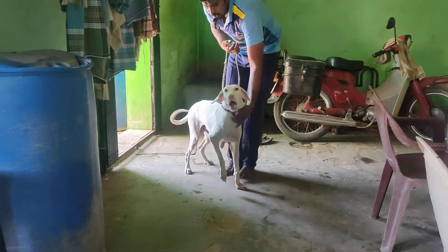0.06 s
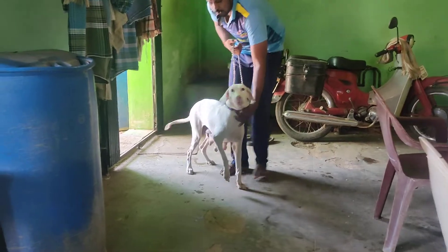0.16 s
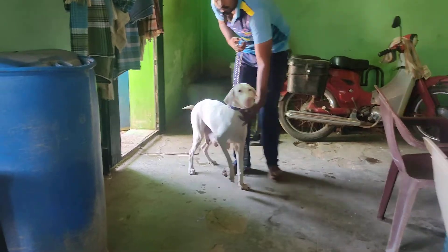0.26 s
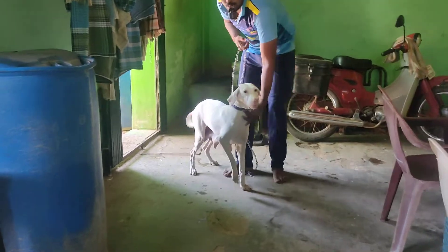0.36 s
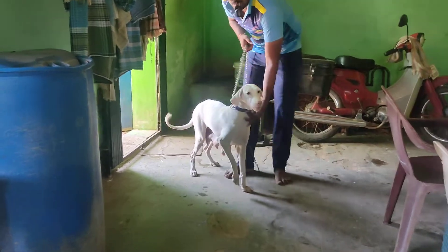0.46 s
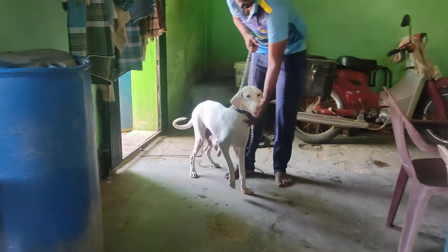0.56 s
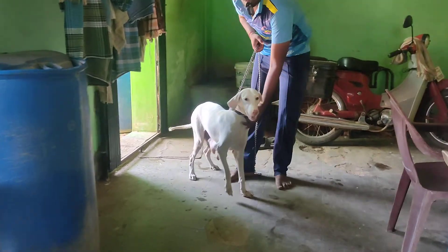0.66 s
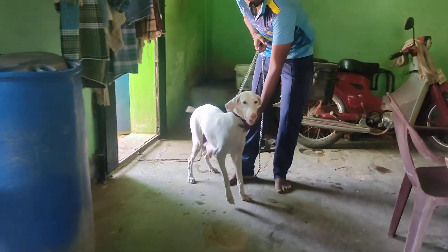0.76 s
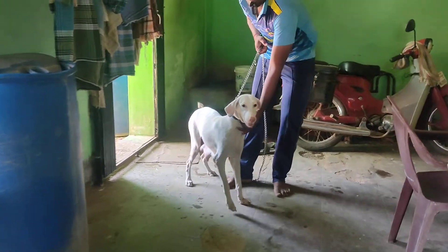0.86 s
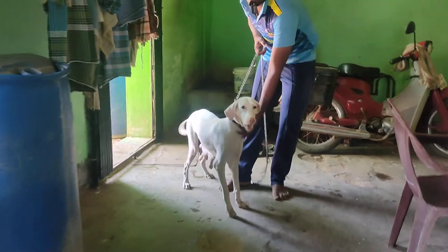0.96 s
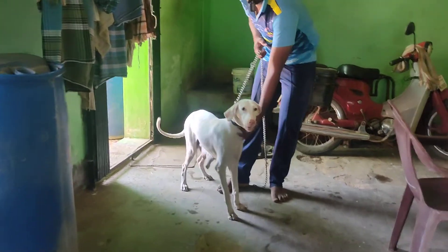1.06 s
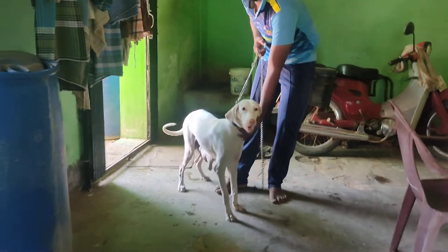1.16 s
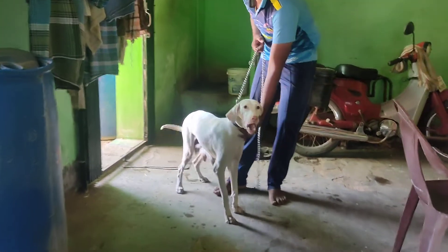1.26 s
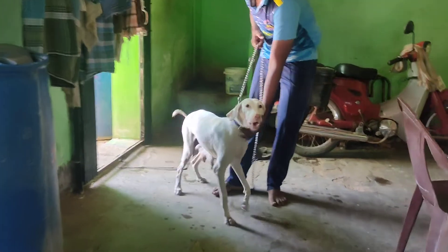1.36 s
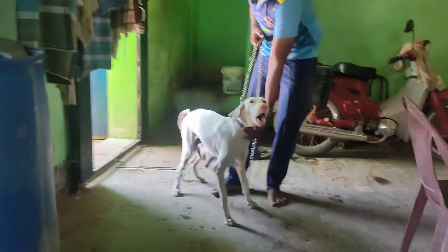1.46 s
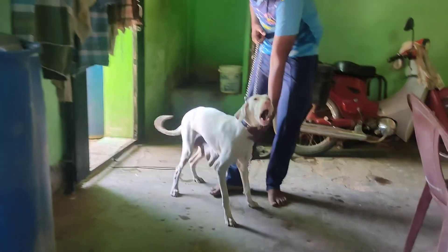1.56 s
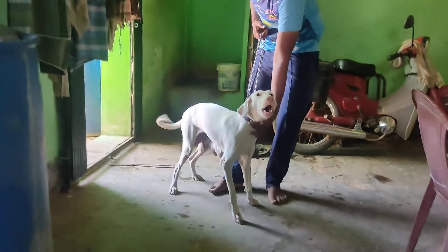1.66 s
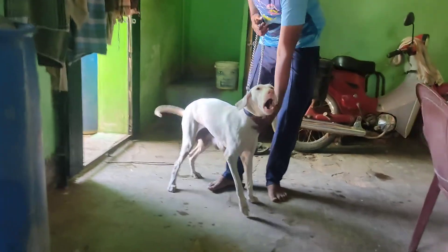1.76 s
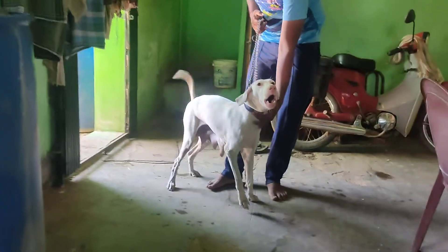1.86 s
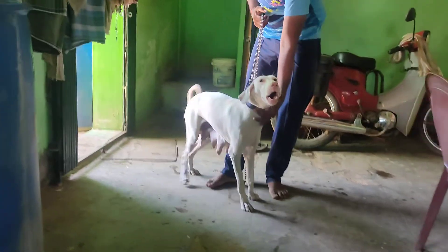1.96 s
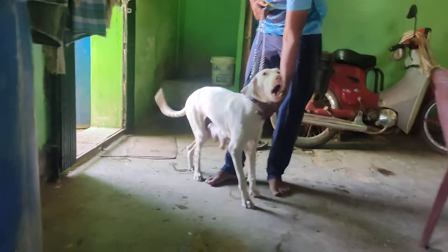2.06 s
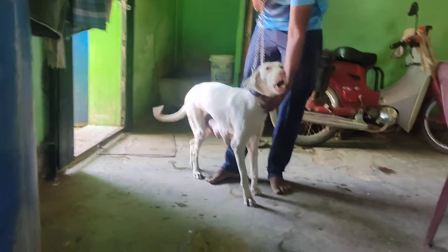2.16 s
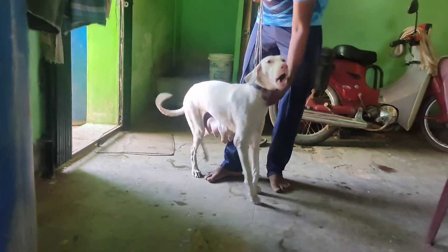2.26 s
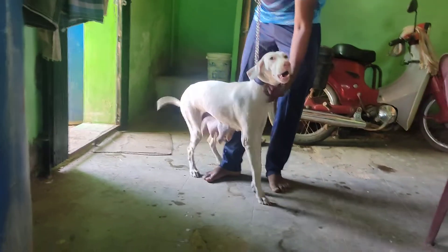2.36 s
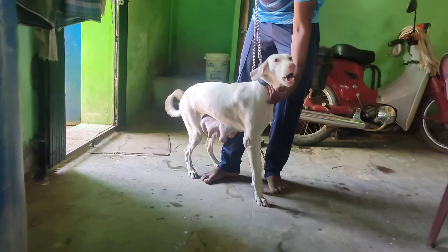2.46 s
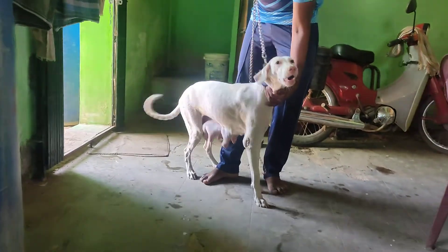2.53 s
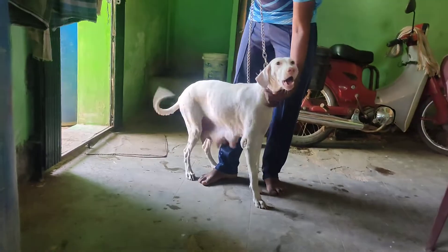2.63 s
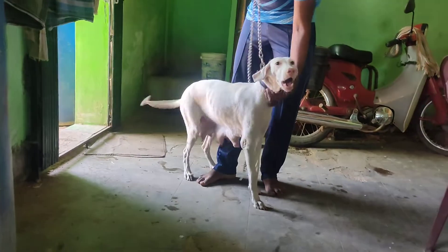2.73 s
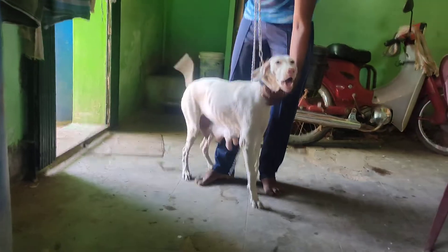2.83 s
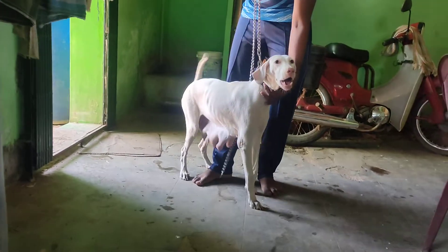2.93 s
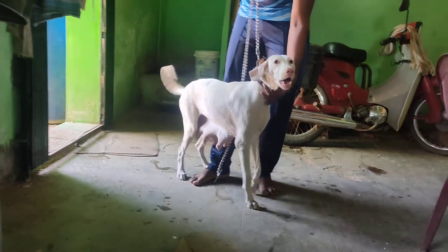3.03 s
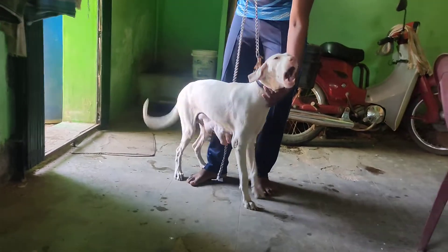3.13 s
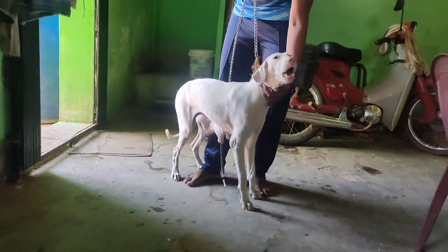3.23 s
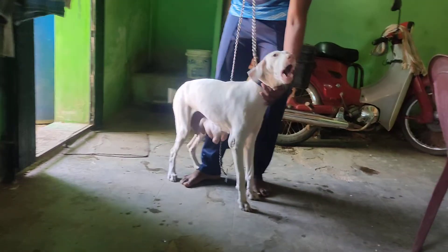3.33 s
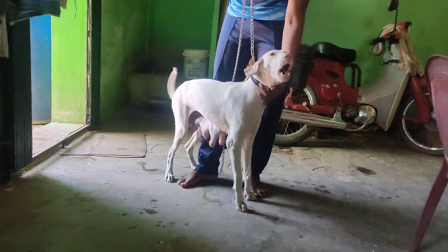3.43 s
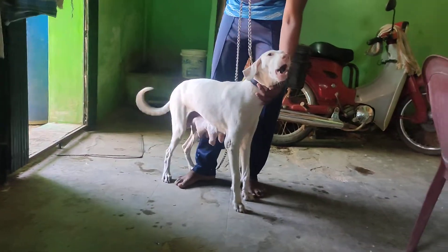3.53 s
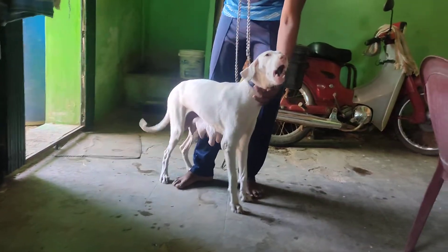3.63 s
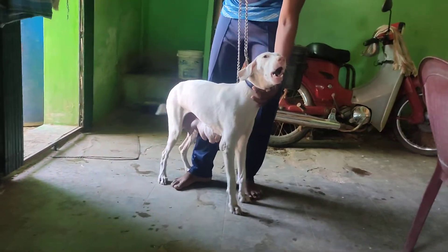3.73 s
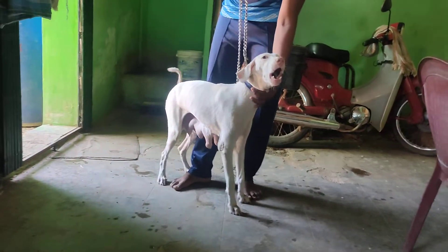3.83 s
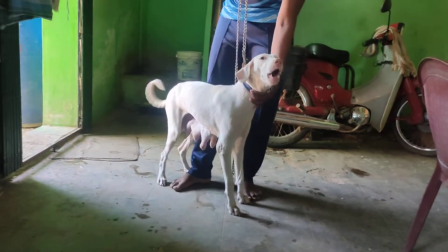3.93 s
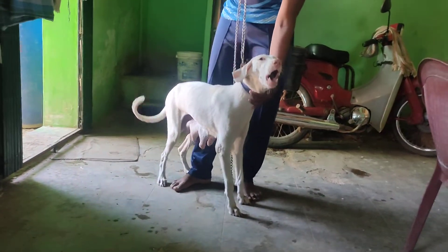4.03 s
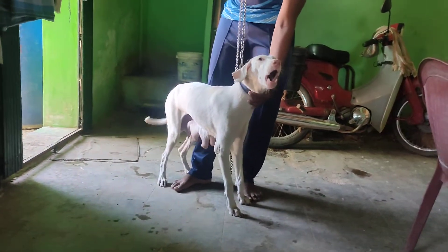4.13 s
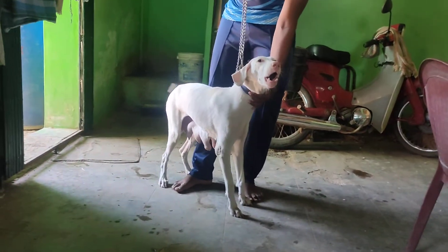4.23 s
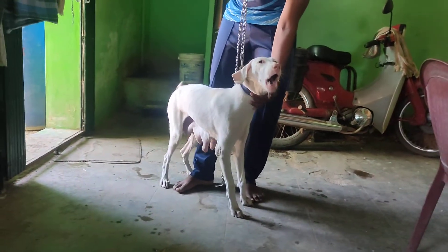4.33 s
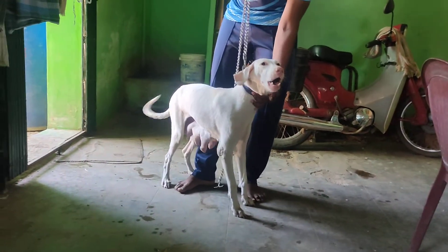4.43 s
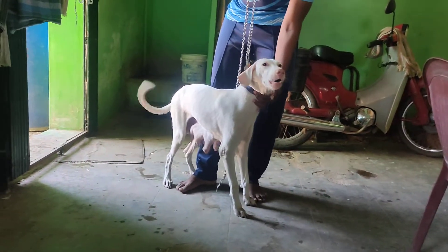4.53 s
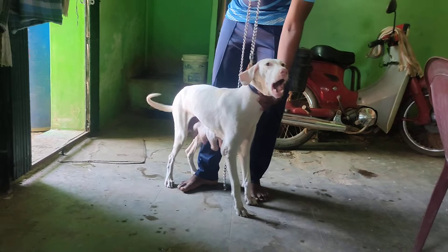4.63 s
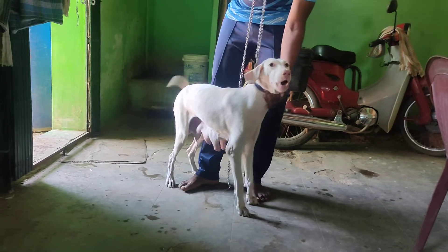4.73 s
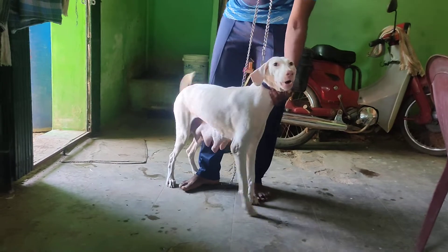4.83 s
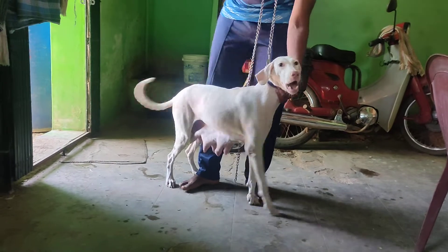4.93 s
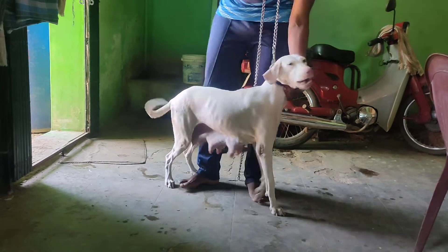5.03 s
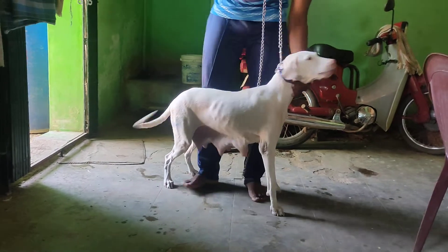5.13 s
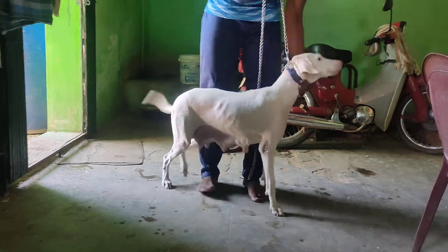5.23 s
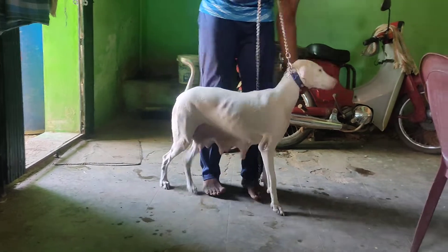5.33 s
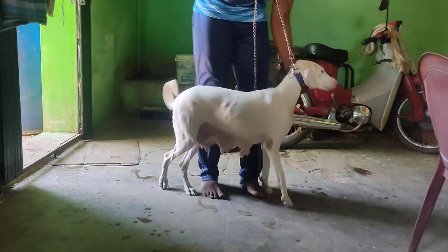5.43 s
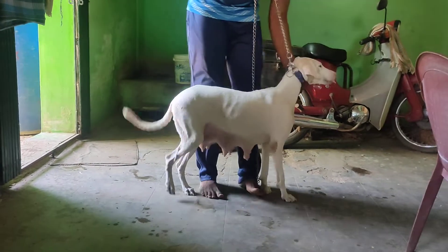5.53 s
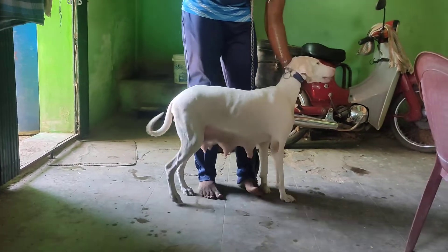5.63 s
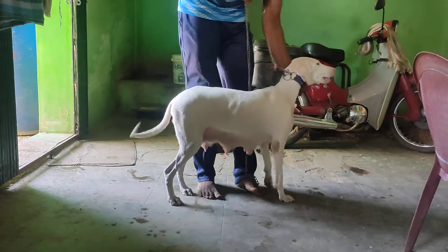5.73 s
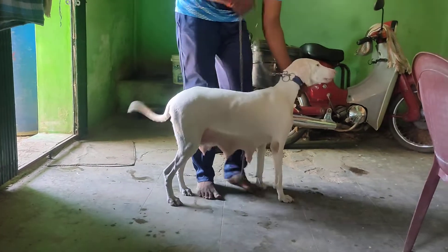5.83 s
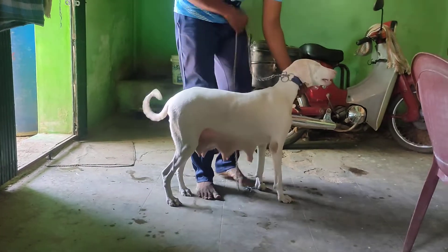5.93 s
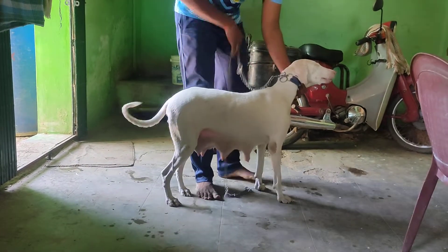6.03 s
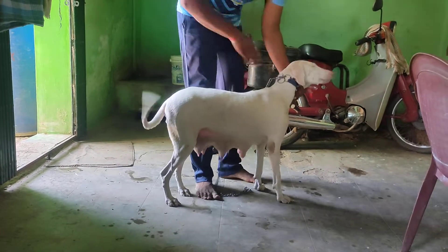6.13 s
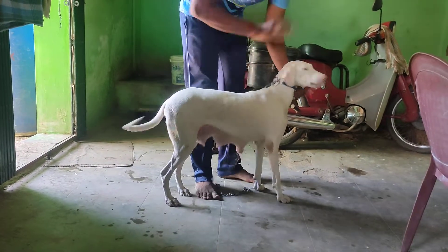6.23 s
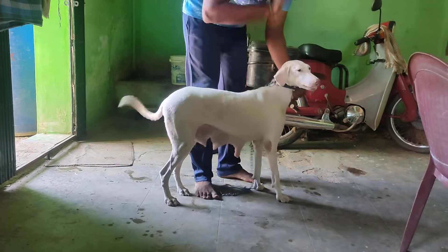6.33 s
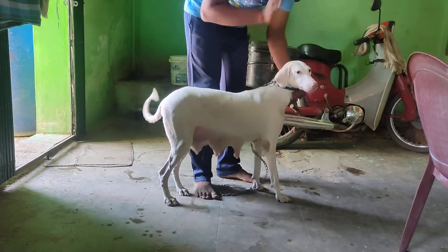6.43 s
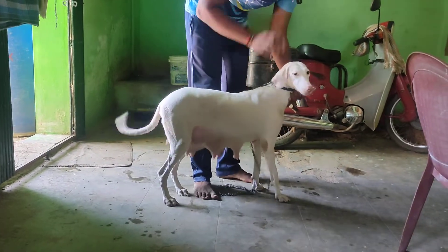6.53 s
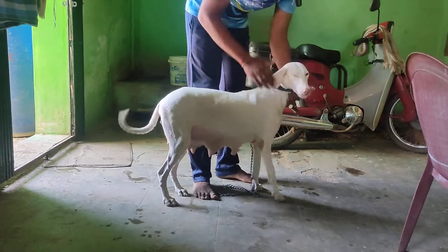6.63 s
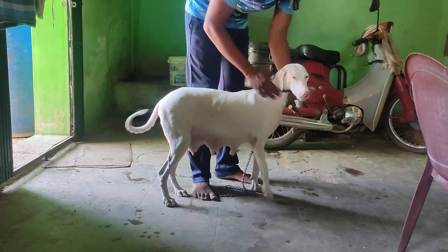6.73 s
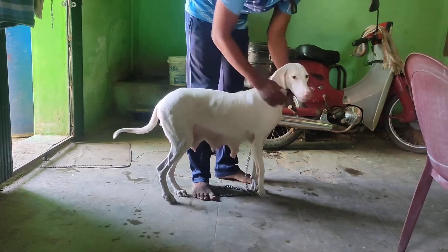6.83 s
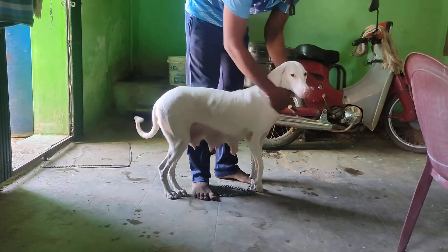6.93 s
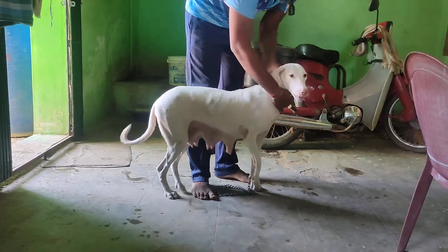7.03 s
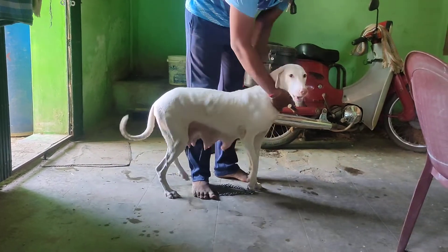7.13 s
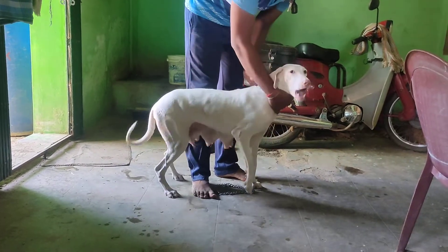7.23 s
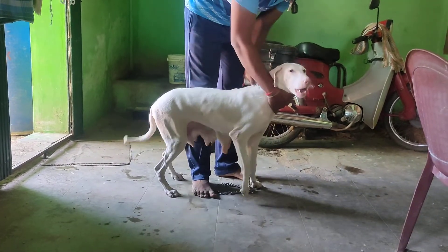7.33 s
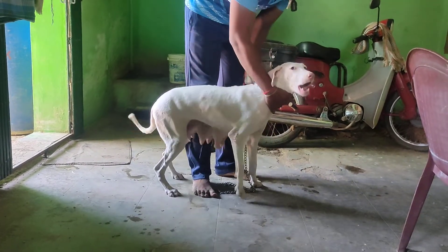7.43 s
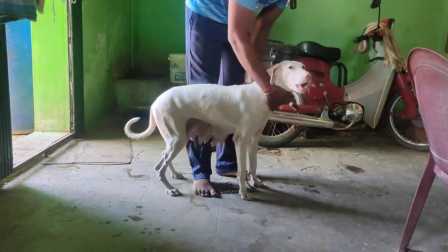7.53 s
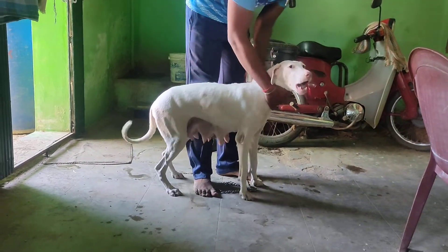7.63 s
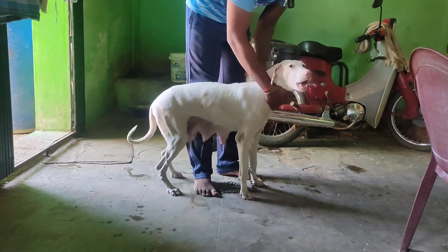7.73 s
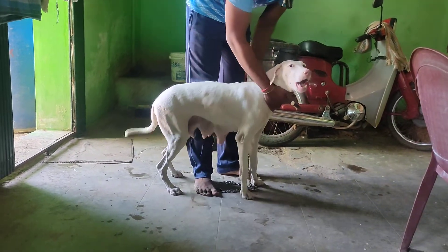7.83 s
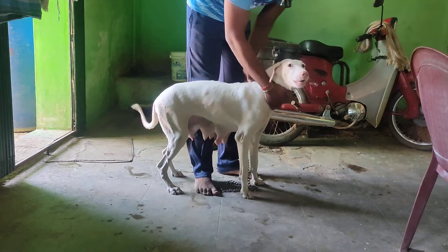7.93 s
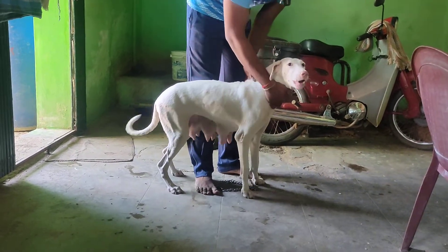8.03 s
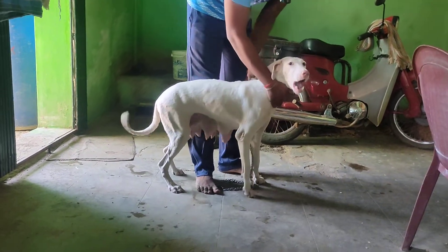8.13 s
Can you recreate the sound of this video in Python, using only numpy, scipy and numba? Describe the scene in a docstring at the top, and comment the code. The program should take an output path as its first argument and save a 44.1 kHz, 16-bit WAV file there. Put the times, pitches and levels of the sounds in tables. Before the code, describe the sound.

Hoarse, ringing dog barks fire quickly in a bare echoing room, broken by a rasping breath, a groan, a chain rattle and renewed barking.

```python
"""Chained dog barking in a bare concrete room

A dog barks in rapid runs, with rasping in-breaths, groans, growls, huffs and thin wheezes: uneven fold pulses
and air through resonances. A chain slides as noise grains and rings chime as struck decaying modes. Room noise,
a thin tone and a high whine lie behind; a far yap comes only as echo. All but these beds and the yap is heard
both directly and in a strong room echo (the chain only directly). A phone cuts bass, ducks gain and limits."""
import sys
import numpy as np
from scipy import signal
from scipy.fft import rfft, irfft
from scipy.io import wavfile
from scipy.ndimage import uniform_filter1d, minimum_filter1d
from numba import njit

SR = 44100
rng = np.random.default_rng(int(sys.argv[2]) if len(sys.argv) > 2 else 0)


def generate_wav(signal):
    """Clip the signal to [-1, 1] and save it as 16-bit WAV at the path in sys.argv[1]."""
    frames = np.transpose(np.atleast_2d(signal))
    scaled = np.clip(frames, -1, 1) * 32767
    pcm = np.round(scaled).astype(np.int16)
    wavfile.write(sys.argv[1], SR, pcm)


N = 360738

# throat resonances of all calls but the barks, for a 600 Hz mouth: hz, width_hz, level_db (relative)
RASP_RING = [(1321.8, 300, 4.5), (2080, 510, 3), (2800, 610, 2.5), (3528.5, 470, 1), (3820, 830, -9)]
# hiss resonances at the teeth in the same calls: hz, width_hz, level_db (relative)
RASP_HISS = [(5700, 910, -3.5), (7000, 1500, 8), (9500, 1400, 1.5), (14600, 1300, 0.5)]


def from_db(db):
    """Decibels to an amplitude factor."""
    return 10 ** (np.asarray(db) / 20)


def rms_one(x):
    """Scale to an rms of 1."""
    return x / np.sqrt(np.mean(x ** 2) + 1e-20)


def in_time(tables, fade=.014):
    """A gate that opens from each table's start and shuts fade s past its end, then the joined columns."""
    t, rows = np.arange(N) / SR, np.concatenate(tables)
    gate = sum(np.clip(np.minimum(t - a[0][0], a[-1][0] + fade - t) / fade, 0, 1) for a in tables)
    return [gate] + [np.interp(t, rows[:, 0], column) for column in rows[:, 1:].T]


def drift(rate_hz):
    """Random wander, noise through a two-pole low-pass at rate_hz; rms 1."""
    r = np.exp(-2 * np.pi * rate_hz / SR)
    return rms_one(signal.lfilter([1], [1, -2 * r, r * r], rng.standard_normal(N + SR))[SR:])


@njit
def moving_peak(x, hz, width_hz, sr):
    """A two-pole resonance whose centre follows hz."""
    out, r = np.zeros(len(x)), np.exp(-np.pi * width_hz / sr)
    for i in range(2, len(x)):
        feedback = 2 * r * np.cos(2 * np.pi * hz[i] / sr) * out[i - 1] - r * r * out[i - 2]
        out[i] = x[i] - x[i - 2] + feedback
    return out


def sharp_peak(x, hz, width_hz):
    """A resonance applied twice, for dark valleys on both sides; rms 1."""
    hz, width_hz = hz * np.ones(N), float(width_hz)
    once = moving_peak(x, hz, width_hz, SR)
    return rms_one(moving_peak(once, hz, width_hz, SR))


def peaks(x, modes, stretch=1):
    """Resonances side by side, all moved by stretch; rms 1."""
    return rms_one(sum(from_db(db) * sharp_peak(x, hz * stretch, width) for hz, width, db in modes))


def shaped_noise(spectrum, channels):
    """White noise coloured by a (Hz, dB) spectrum; rms 1."""
    hz, db = np.transpose(spectrum)
    bins_hz = np.arange(1, N // 2 + 2) * SR / N
    gain = from_db(np.interp(np.log(bins_hz), np.log(hz), db))
    return rms_one(irfft(rfft(rng.standard_normal((channels, N))) * gain, N))


def room_noise():
    """Wandering air noise, a thin tone that swells and fades, and a high whine, stronger on the left."""
    # thin tone: time_s, pitch_hz, level_db (relative)
    thin_tone = [(4.5, 1865, -62), (4.8, 1870, -49), (5.1, 1868, -54), (5.4, 1870, -50), (5.6, 1868, -53),
                 (5.9, 1868, -56)]
    # colour of the room's air: hz, density_db (per Hz, relative)
    air_spectrum = [(120, -83), (200, -56.5), (263, 5), (1020, -12.5), (1120, -22.5), (1840, -11),
                    (2020, -16), (4770, -31.5), (16000, -27.5)]
    gate, hz, level_db = in_time([thin_tone], fade=0.15)
    tone = gate * from_db(level_db - 0.5) * np.sin(2 * np.pi * np.cumsum(hz) / SR)
    whine_hz, left_right_db = 15625, np.array([[-60], [-70]])
    whine = from_db(left_right_db + 1.5 * drift(8)) * np.sin(2 * np.pi * whine_hz * np.arange(N) / SR)
    air = from_db(-45 + 4 * drift(4.0)) * shaped_noise(air_spectrum, channels=2)
    return air + tone + whine


def yap():
    """A short hoarse call far off: a few overtones with shaky pitch and levels."""
    # the call: time_s, pitch_hz, level_db (relative)
    far_call = [(.69, 375, -47.5), (.725, 378.6, -40), (.76, 372, -44), (.8, 383, -66)]
    # its overtones: multiple, level_db (relative)
    orders = [(2, 0), (3, 5.5), (4, -1)]
    gate, hz, level_db = in_time([far_call])
    phase = 2 * np.pi * np.cumsum(hz * (1 + 0.032 * drift(110))) / SR
    overtones = sum(from_db(db + 5.8 * drift(110)) * np.sin(k * phase) for k, db in orders)
    return gate * from_db(level_db) * overtones


def sliding_chain():
    """Links rub and knock: coloured noise with a dense uneven flutter in level."""
    # slides of the chain: time_s, level_db (relative)
    slides = [
        [(0.12, -42), (0.29, -25), (0.39, -28), (0.518, -40.5), (0.66, -39), (0.814, -29), (0.95, -40)],
        [(5.62, -49), (5.872, -35.5), (6.012, -15.5), (6.156, -11.5), (6.226, -3), (6.285, -5), (6.305, 0),
         (6.335, 0.5), (6.494, -22), (6.62, -34)],
        [(6.685, -26), (6.756, -28.5), (6.89, -47), (6.95, -39), (7.02, -61)],
    ]
    # colour of the links: hz, density_db (per Hz, relative)
    link_spectrum = [(710, -0.5), (1200, -5), (1270, -0.5), (4040, -6), (5350, -14.5), (7170, -2),
                     (11700, -12.5), (15200, -3.5), (16000, 16.5)]
    gate, level_db = in_time(slides)
    return gate * from_db(level_db + 3.4 * drift(27) + 0.72 * drift(550)) * shaped_noise(link_spectrum, channels=2)


def struck(blows, modes):
    """Each blow ticks and rings every mode with a strength of its own; swinging makes the ring flutter."""
    at, out = [round(s * SR) for s, db in blows], np.zeros(N)
    spread_db = rng.normal(0, 3, (len(at), len(modes)))
    for k, (hz, level_db, t60) in enumerate(modes):
        clicks = np.zeros(N)
        clicks[at] = from_db(np.array(blows)[:, 1] + level_db - 0.5 + spread_db[:, k])
        r, w = from_db(-60 / (t60 * SR)), 2 * np.pi * hz / SR
        ringing = signal.lfilter([0, np.sin(w)], [1, -2 * r * np.cos(w), r * r], clicks + 1e-18)
        out += from_db(7.5 * drift(130)) * ringing
        out += from_db(-9) * np.diff(clicks, prepend=0)  # the tick
    return out


def lead_rings():
    """Two rings on the lead, each struck into its own set of decaying modes."""
    # modes of the collar ring, then of the clasp: hz, level_db (relative), t60_s
    collar_modes = [(7117, -5, .2), (7472, -5, .22), (8969, -16, .15), (10380, -8, .24), (14630, -5, .18)]
    clasp_modes = [(9577, -7, .11), (9932, -7, .13), (10080, -9, .13), (12610, -13, .16)]
    # blows on the collar ring, then on the clasp: time_s, level_db (relative)
    collar_blows = [(0.1303, -47), (0.2076, -44), (0.2319, -44.5), (0.2913, -46), (0.3495, -41),
                    (0.4531, -51), (0.5475, -49.5), (0.6809, -62), (0.709, -50), (2.5198, -50),
                    (5.8117, -58), (5.8511, -47), (5.9088, -46), (5.9996, -41), (6.0367, -46),
                    (6.4089, -36.5), (6.6944, -37.5)]
    clasp_blows = [(0.2713, -43), (0.4549, -39), (1.2381, -45), (5.3694, -48.5), (6.0644, -31),
                   (6.1094, -27), (6.3394, -31)]
    return struck(collar_blows, collar_modes) + struck(clasp_blows, clasp_modes)


def head_resonances(source, breathy, jaw):
    """Tongue, lip and throat resonances move as the head stretches; a rasp at the palate follows the jaw."""
    # time_s, tongue_hz, lip_hz, tongue_db, lip_db (both re throat ring), throat_hz, throat_db (relative)
    head_path = [(0.1, 1185, 2100, 6.5, -5, 1740, -0.5), (1.05, 1078, 2460, 3, -7, 1684, -13),
                 (1.28, 1187, 2920, 4, -9, 1677, -6), (1.47, 1048, 2530, -4.5, -16.5, 1576, -4.5),
                 (1.65, 934, 2190, -6.5, -12.5, 1593, -9), (1.82, 873, 2310, -2, -9, 1684, -4),
                 (1.95, 796, 2330, 0, -12.5, 1600, -11), (2.1, 876, 2330, -1.5, -11, 1607, -5),
                 (2.28, 877, 2270, -3, -14.5, 1630, -6), (2.5, 913, 2210, -4.5, -17.5, 1680, -11),
                 (3.15, 1115, 2080, 2.5, -18, 1535, -8.5), (3.33, 743, 2000, 2.5, -10, 1550, -3.5),
                 (3.5, 733, 2030, 0.5, -14.5, 1584, -8.5), (3.68, 946, 2120, -3, -10.5, 1558, -6.5),
                 (3.85, 950, 2360, 3, -3, 1650, 1.5), (4.03, 976, 2680, 7.5, -6, 1580, -9.5),
                 (4.2, 1133, 2610, 7, -5, 1674, -4), (4.4, 1114, 2680, 7, -9, 1604, -4.5),
                 (4.63, 1083, 2620, 2, -17, 1502, -6), (4.69, 890, 2580, 2.5, -15.5, 1520, -7.5),
                 (7.23, 840, 3100, 21, 1.5, 1885, -2), (7.42, 877, 2780, 8.5, -1, 1735, -3.5),
                 (7.62, 890, 2770, 21, 4, 1620, 6), (7.78, 910, 2600, 7, -2.5, 1560, -5),
                 (7.86, 1040, 2640, 4, -7, 1593, -3.5), (8.15, 870, 3030, 15, 7, 1730, 5)]
    # palate rasp, pitched anew in each bark: time_s, level_db (relative), hz
    palate_path = [(0.037, -36.5, 3640), (0.9935, -37.5, 3330), (1.249, -39.5, 3540), (1.4187, -30.5, 4170),
                   (1.5952, -47.5, 3590), (1.7574, -48, 3670), (1.89, -51.5, 3590), (2.0594, -52, 3780),
                   (2.239, -37, 3510), (2.4244, -38.5, 3310), (3.1286, -42, 4390), (3.291, -38, 4730),
                   (3.458, -37.5, 3600), (3.6472, -31, 3430), (3.804, -50, 5080), (3.985, -46.5, 5220),
                   (4.1705, -49, 5310), (4.3686, -55.5, 3790), (4.6324, -33, 3570), (7.182, -24.5, 3350),
                   (7.3743, -43, 4540), (7.5845, -38, 3510), (7.77, -45, 4330), (8.1494, -40.5, 3460)]
    _, tongue_hz, lip_hz, tongue_db, lip_db, throat_hz, throat_db = in_time([head_path])
    _, palate_db, palate_hz = in_time([palate_path])
    tongue_hz = tongue_hz * (1 - 0.11 * (1 - jaw))   # a shut jaw lowers it
    throat = from_db(throat_db - 0.5) * sharp_peak(breathy, throat_hz, 89)
    tongue = from_db(tongue_db) * sharp_peak(source, tongue_hz, 95)
    lips = from_db(lip_db) * sharp_peak(breathy, lip_hz, 520)
    palate_gain = from_db(-29.5 + palate_db - palate_db.mean())
    return throat + tongue + lips, palate_gain * jaw * sharp_peak(breathy, palate_hz, 450)


def voice(tables, ring, hiss, fold_share, jitter, shimmer_db, air, width_hz, tone_db, chest_db, lift, clear=0.,
          moving_head=False):
    """Uneven vocal-fold pulses and air gated by them, through mouth, throat and teeth."""
    # overtones of a clear voice: multiple, level_db (relative)
    overtones = [(2, -12), (3, -19.5), (4, -32), (5, -27.5)]
    gate, mouth_hz, level_db, ring_db, hiss_db, *more = [uniform_filter1d(c, size=400) for c in in_time(tables)]
    clear, whoop_db, jaw = more or (clear, 0, 1)
    clear = np.clip(clear, 0, 1)
    # the folds beat at a share of the mouth tone
    phase = np.cumsum(fold_share * mouth_hz * (1 + jitter * drift(60.05))) / SR
    pulses = np.diff(np.floor(phase), prepend=0) * from_db(shimmer_db * np.tanh(drift(273)))
    gusts = rng.standard_normal(N) * (.6 + np.cos(np.pi * phase) ** 2)
    source = rms_one(pulses) + air * gusts
    breathy = source + 5.8 * gusts   # the upper resonances hear more air
    # the tone held by the mouth
    turn = 2 * np.pi * np.cumsum(mouth_hz * (1 + 0.005896 * drift(39.56))) / SR
    upper = sum(from_db(db + 2.723 * drift(42)) * np.sin(k * turn) for k, db in overtones)
    held = np.sin(turn) + clear * jaw * upper
    tone = from_db(tone_db + whoop_db + 2.9 * clear + 9.48 * (1 - clear) * drift(105)) * held
    stretch = (mouth_hz / 600) ** lift   # a wider mouth lifts the other resonances
    chest = from_db(chest_db) * sharp_peak(source, 315 * stretch, 90)
    throat = peaks(breathy, ring, stretch)
    teeth = from_db(hiss_db + 2 * drift(24)) * peaks(gusts, hiss)
    if moving_head:
        head, palate = head_resonances(source, breathy, jaw)
        throat, teeth = throat + head, teeth + palate
    mouth = (1 - 0.3 * clear) * sharp_peak(source, mouth_hz, width_hz)   # a clear voice rasps less
    return gate * from_db(level_db) * (mouth + tone + chest + from_db(ring_db) * throat + teeth)


def wheezes():
    """Thin wheezes through the nose: air noise in one gliding resonance."""
    # time_s, hz, level_db (relative)
    nose_air = [
        [(.47, 3450, -61), (.52, 3240, -38), (.6, 3130, -55)],
        [(1.17, 4400, -58), (1.2, 3930, -42), (1.23, 3200, -41), (1.27, 3020, -51)],
    ]
    gate, hz, level_db = in_time(nose_air)
    return gate * from_db(level_db) * sharp_peak(rng.standard_normal(N) * from_db(2.0 * drift(46)), hz, 540)


def huffs():
    """Short airy puffs that fade by 14 dB over their length."""
    # start_s, length_s, mouth_hz, level_db (relative)
    puffs = [(0.477, 0.12, 875, -33.5), (5.536, 0.15, 965, -46), (6.525, 0.17, 790, -40)]
    ring_db, hiss_db = -6.5, -22   # re level
    paths = [[(s, hz, db, ring_db, hiss_db), (s + length, hz, db - 14, ring_db, hiss_db)]
             for s, length, hz, db in puffs]
    return voice(paths, RASP_RING, RASP_HISS, fold_share=.15, jitter=.3, shimmer_db=4, air=5, width_hz=350.,
                 tone_db=-25, chest_db=-35, lift=.05)


def growls():
    """Low half-clear growling with a strong chest resonance."""
    # time_s, mouth_hz, level_db (relative)
    growl_paths = [
        [(5.742, 792, -37), (5.8, 752.5, -41.5), (5.89, 522.6, -34), (5.98, 604, -29.5), (6.18, 447.5, -35.5),
         (6.21, 434.4, -53)],
    ]
    ring_db, hiss_db = -13, -43   # re level
    paths = [[(*row, ring_db, hiss_db) for row in path] for path in growl_paths]
    return voice(paths, RASP_RING, RASP_HISS, fold_share=0.24, jitter=0.09, shimmer_db=-0.5, air=0.29,
                 width_hz=170.0, tone_db=-3.5, chest_db=2.5, lift=0.032, clear=0.5)


def groans():
    """Clear gliding groans: a held tone with overtones over uneven fold pulses."""
    # time_s, mouth_hz, level_db (relative), hiss_db (re level)
    groan_paths = [
        [(4.94, 778.4, -73, 7), (4.975, 767.6, -36, 6), (5.02, 727.8, -24, -26), (5.11, 689.6, -25.5, -26),
         (5.16, 590.6, -20.5, -29.5), (5.211, 497, -26.5, -23.5), (5.278, 479, -37.5, -16),
         (5.36, 551, -64, -16), (5.39, 513, -69, -28)],
        [(6.43, 433, -49, -36), (6.5, 430, -37.5, -34), (6.6, 431.2, -42.5, -33)],
        [(6.72, 380.9, -44, -25), (6.8, 370.3, -40.5, -34), (6.9, 380, -46.5, -36), (6.98, 410.3, -39.5, -37),
         (7.06, 520.7, -46, -32), (7.11, 721.6, -41.5, -36), (7.16, 779, -45.5, -34)],
    ]
    ring_db = -11   # re level
    paths = [[(s, hz, db, ring_db, hiss_db) for s, hz, db, hiss_db in path] for path in groan_paths]
    return voice(paths, RASP_RING, RASP_HISS, fold_share=0.34, jitter=0.074, shimmer_db=-5.5, air=0.36,
                 width_hz=160.0, tone_db=-1.0, chest_db=-10.5, lift=0.48, clear=0.96)


def rasps():
    """A rasping intake of air: slow, very uneven fold pulses and much breath."""
    # time_s, mouth_hz, level_db (relative), hiss_db (re level)
    intake = [(2.581, 613.6, -30.5, -14.5), (2.68, 606.3, -30, -9.5), (2.899, 607.5, -30, -11),
              (3.089, 623.3, -35.5, -16.5)]
    ring_db = 1   # re level
    paths = [[(s, hz, db, ring_db, hiss_db) for s, hz, db, hiss_db in intake]]
    return voice(paths, RASP_RING, RASP_HISS, fold_share=.13, jitter=.25, shimmer_db=4.5, air=1.3,
                 width_hz=140., tone_db=-5, chest_db=-11, lift=.35)


def bark(start, length, level_db, low_hz, top_hz, ring_db, hiss_db, whoop_db, clear):
    """Swell, sagging hold and fade; the mouth tone scoops in, then follows the jaw as it opens and half shuts."""
    attack_s, release_s = .032, .04
    widest_s = .65 * length
    s = np.array([0, attack_s, widest_s, length, length + release_s])
    jaw = np.interp(s, [attack_s, widest_s, length], [0, 1, .6])
    onset = s == 0
    swell_db = -9 * s / length + np.array([-15, 0, 0, 0, -22])
    mouth_hz = low_hz + (jaw - .4 * onset) * (top_hz - low_hz)   # the tone starts outside the jaw's range
    late_db = -10 * onset   # hiss and throat ring set in a little after the voice
    ring_db = ring_db - 4 * (1 - jaw) + late_db   # a shut jaw muffles the throat ring
    hiss_db = hiss_db - 9 * s / length + late_db   # the hiss thins out
    whoop = np.array([1, .55, 0, 0, 0])
    return np.transpose([start + s, mouth_hz, level_db + swell_db, ring_db, hiss_db,
                         np.maximum(whoop, clear), whoop * whoop_db, jaw])


def barks():
    """Runs of barks: fold pulses at half the mouth tone, through a moving head and jaw."""
    # start_s, length_s, level_db (relative), low_hz (mouth once the swell is over), top_hz (jaw widest),
    # ring_db, hiss_db (both re level), whoop_db (on the opening tone), clearness (0-1)
    bark_list = [ (0.022, 0.11, -10, 520.6, 615.4, -9.5, -24, -6, 0.4),
                 (0.985, 0.13, -13, 559.3, 675.5, -9.5, -32.5, 7, 0.42),
                 (1.227, 0.089, -8.5, 559.5, 688.3, -6.5, -30, 9.5, 0.76),
                 (1.403, 0.1, -11.5, 505, 681.1, 0.5, -25, 8.5, 0.26),
                 (1.58, 0.088, -8, 519.8, 639.8, -2.5, -28, 4.5, 0.3),
                 (1.743, 0.1301, -11.5, 551, 580.1, -7, -30.5, 4, 0.44),
                 (1.868, 0.15, -10.5, 589, 570.6, -8.5, -27.5, -4, 0.3),
                 (2.033, 0.14, -10, 569.3, 539.6, -7.5, -27, -4, 0.51),
                 (2.216, 0.1, -11.5, 540, 602.4, -6.5, -24.5, -11, 0.27),
                 (2.397, 0.11, -10.5, 502, 597.2, -2, -24.5, -1, 0.24),
                 (3.11, 0.092, -6, 618.2, 642.4, -5.5, -28.5, -20, 0.27),
                 (3.275, 0.11, -13, 581.4, 686.8, -5, -24, 0, 0.15),
                 (3.435, .12, -10.5, 556, 657.2, -5, -27.5, -8.5, 0.39),
                 (3.627, 0.088, -5.5, 565, 636.6, -9.5, -29, -0.5, 0.47),
                 (3.784, 0.13, -9, 589.7, 570.6, -17.5, -30, -11, .5),
                 (3.968, 0.085, -4.5, 542, 596.2, -14.5, -27.5, 2.5, 0.67),
                 (4.15, 0.087, -7.5, 549.8, 570.4, -12.5, -28.5, -1, 0.64),
                 (4.343, 0.094, -7.5, 552.5, 599, -9.5, -29.5, 4.5, .6),
                 (4.612, 0.077, -5, 535, 613.8, -8, -30.5, -10.5, 0.76),
                 (7.161, 0.13, -10.5, 683.3, 720.3, -18, -28.5, -6, 0.23),
                 (7.362, 0.096, -10, 617.6, 760.7, -14.5, -28, 3, 0.32),
                 (7.557, 0.11, -10.5, 585.2, 719.3, -21.5, -28, 5.5, 0.36),
                 (7.758, 0.11, -11.5, 591.5, 686.4, -7, -29.5, 6, 0.23),
                 (8.125, 0.14, -9, 697, 769, -30, -33, 2.5, 0.3), ]
    # throat resonances for a 600 Hz mouth, then hiss at the teeth: hz, width_hz, level_db (relative)
    throat_ring = [(865, 180, 9.5), (1309, 218, -2), (2000, 290, -20.5)]
    teeth_hiss = [(3130, 550, 6), (4540, 460, -4), (7340, 1070, 21), (10600, 600, 11.5),
                  (13900, 5700, 10.5)]
    return voice([bark(*row) for row in bark_list], throat_ring, teeth_hiss, fold_share=.5, jitter=.04,
                 shimmer_db=12, air=.6, width_hz=178.0, tone_db=-2, chest_db=-17.0, lift=0.2, moving_head=True)


def room(x):
    """Echo as noise dying band by band, with a quick early part; the two ports agree only in the bass."""
    # echo bands: centre_hz, t60_s (of the late part), likeness (left to right, -1 to 1)
    bands = [(310.4, 1, 0.81), (565, 0.76, 0.77), (1021, 0.76, 0.042), (2036, 0.77, -0.041),
             (5130, 0.91, -0.45), (9050, 0.63, -0.1)]
    t, echo = np.arange(SR) / SR, 0
    for hz, t60, alike in bands:
        top_hz = min(hz * (np.sqrt(2) if hz < 8000 else 2), 20000)
        band = signal.butter(2, [hz / np.sqrt(2), top_hz], "band", fs=SR, output="sos")
        mid, side = signal.sosfilt(band, rng.standard_normal((2, 2, 1, SR)))
        alike = np.clip(alike, -1, 1)
        late = from_db(-60 * t / t60) / np.sqrt(t60)
        early = from_db(12.5 - 60 * t / 0.05)
        die = (late + early) * np.minimum(t / 0.00051, 1)
        echo = echo + die * (np.sqrt(1 + alike) * mid + np.sqrt(1 - alike) * side * [[1], [-1]])
    # the echo shifts between two patterns as the dog moves, .7 half-turns a second
    turn = np.pi * .7 * np.arange(N) / SR
    echo = echo / np.sqrt(.1 * SR)
    return sum(signal.fftconvolve((x * share)[None], pattern, axes=1)[:, :N]
               for share, pattern in zip((np.cos(turn), np.sin(turn)), echo))


def scene():
    """Direct sound at the two ports, the room's echo and the room noise."""
    dog = from_db(5) * barks() + from_db(-2.0) * rasps() + huffs() + wheezes()
    low_calls = groans() + growls()
    rings = lead_rings()
    direct = from_db(-2.5) * dog + from_db(-1.0) * low_calls
    direct = direct + rings * from_db([[3], [-6]]) + sliding_chain() * from_db([[3.5], [-3.5]])   # left, right
    # groans and growls stir the room less than barks
    into_room = dog + from_db(-4) * low_calls + from_db(3.5) * rings + yap()
    return direct + from_db(-1) * room(into_room) + room_noise()


def record(dry):
    """Steep bass cut, gain ducking under loud sound, a quick peak limiter with faint low thumps, top cut."""
    cut = signal.sosfilt(signal.cheby2(8, 60, 202.3, "high", fs=SR, output="sos"), dry)
    # the left port is brighter, the right one duller, above 7100 Hz
    treble = signal.sosfilt(signal.butter(1, 7100, "high", fs=SR, output="sos"), cut)
    cut = cut + treble * (from_db([[2.5], [-2.5]]) - 1)
    power = uniform_filter1d(np.mean(cut ** 2, axis=0), size=300)
    over_db = np.maximum(10 * np.log10(power + 1e-12) + 32, 0)   # above -32 dB
    slope = 40 * np.arange(N) / SR   # the held excess falls by 40 dB a second
    held_db = np.maximum.accumulate(over_db + slope) - slope
    ducked = cut * from_db(-.3 * uniform_filter1d(held_db, size=300))
    headroom = np.minimum(.6 / (np.abs(ducked) + 1e-9), 1)
    limited = ducked * uniform_filter1d(minimum_filter1d(headroom, size=200), size=120)
    thumps = 0.091 * limited ** 4   # a slight lopsidedness of the converter
    return signal.sosfilt(signal.cheby2(16, 60, 15900, fs=SR, output="sos"), limited + thumps)


dry = scene()
out = record(dry)
generate_wav(out)
```